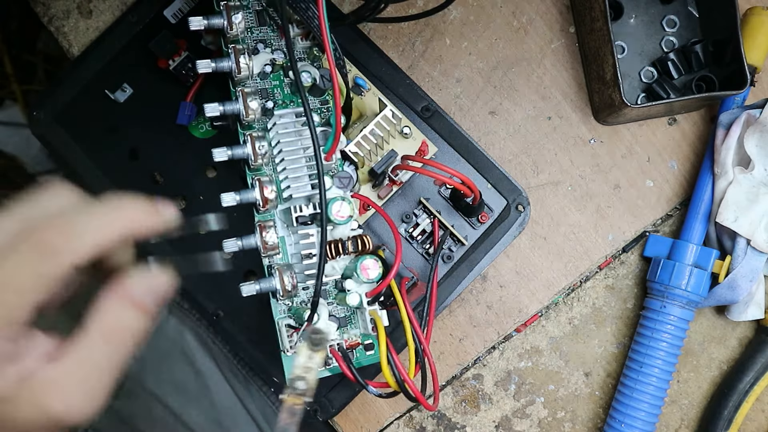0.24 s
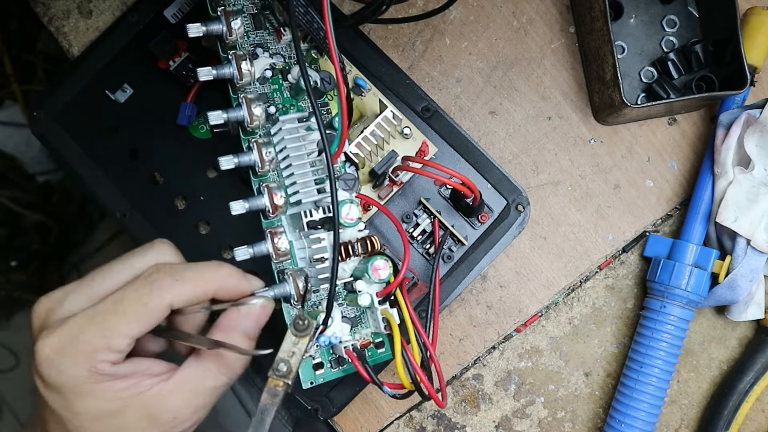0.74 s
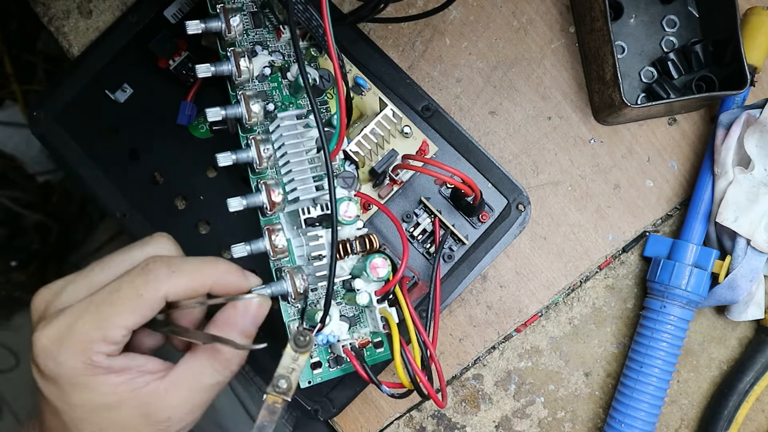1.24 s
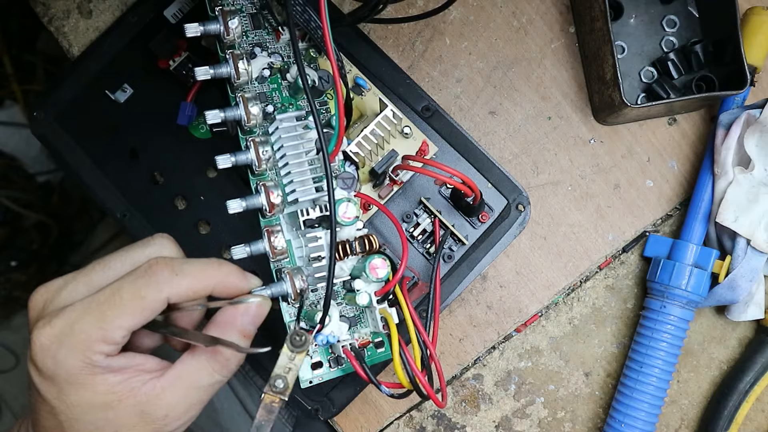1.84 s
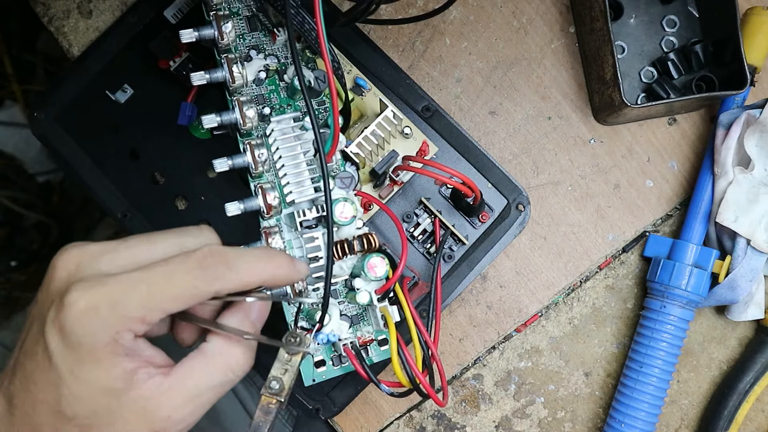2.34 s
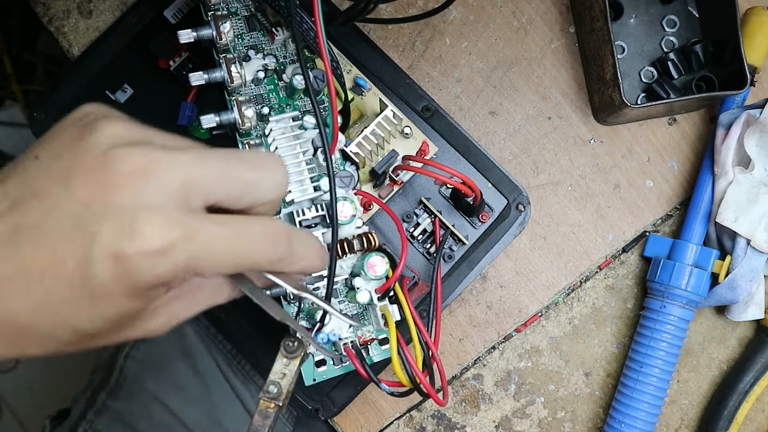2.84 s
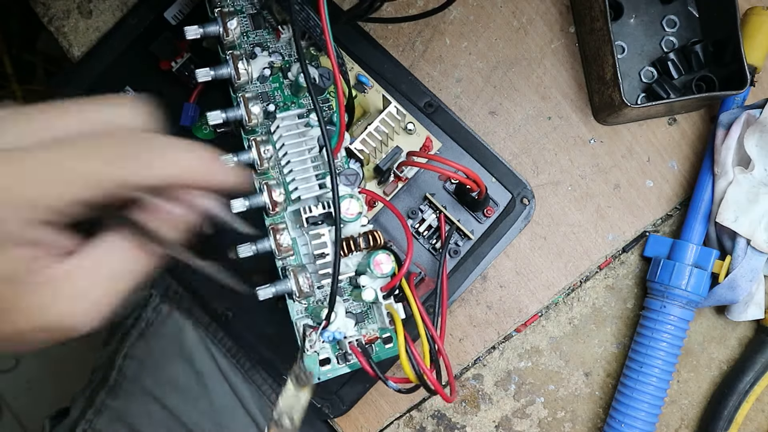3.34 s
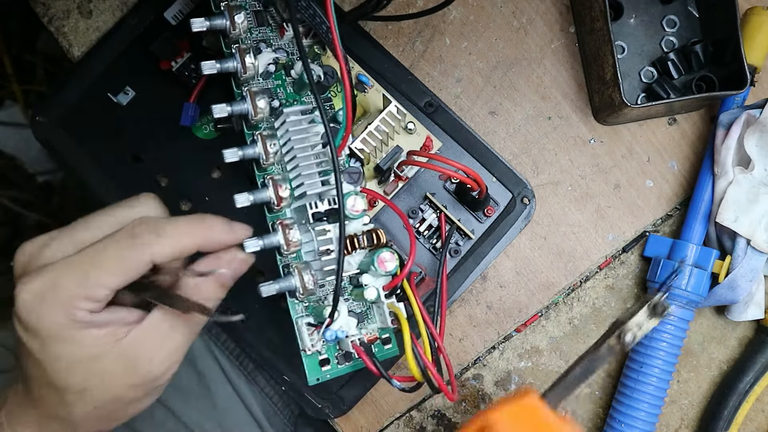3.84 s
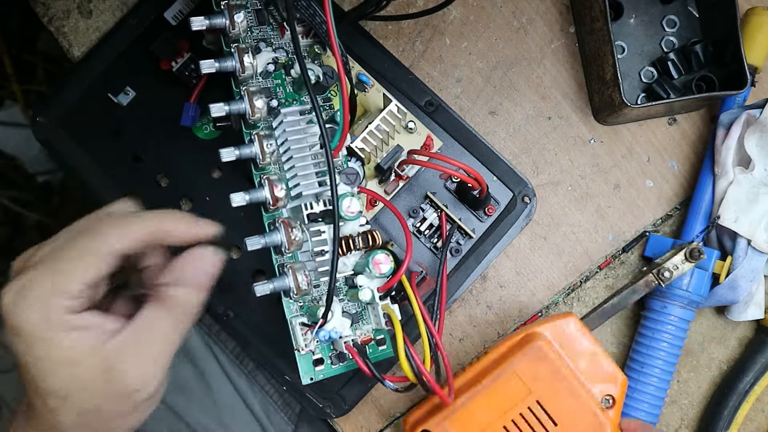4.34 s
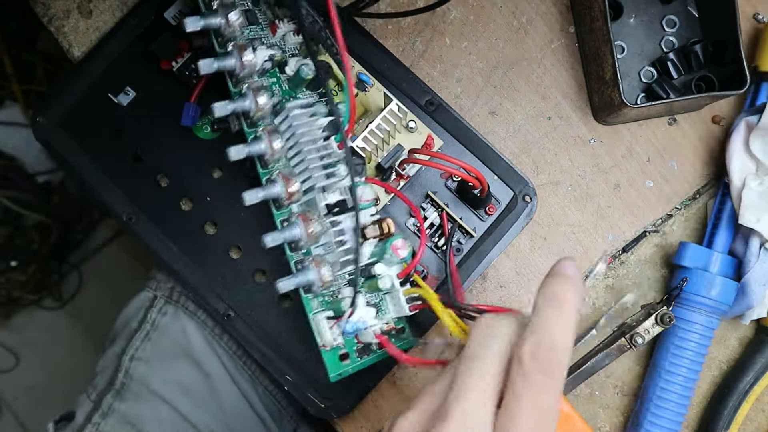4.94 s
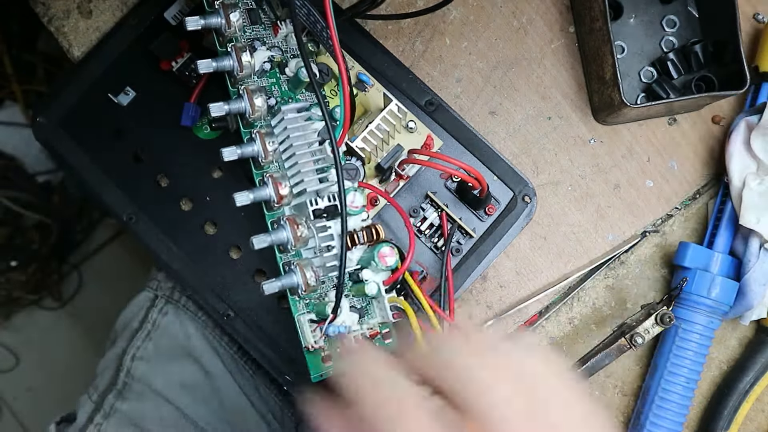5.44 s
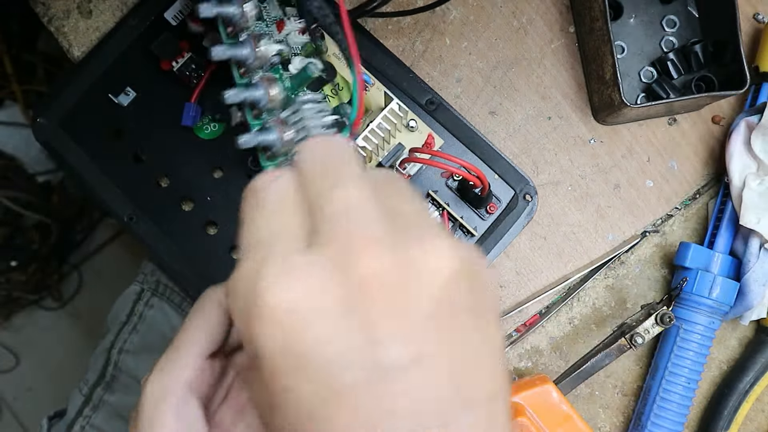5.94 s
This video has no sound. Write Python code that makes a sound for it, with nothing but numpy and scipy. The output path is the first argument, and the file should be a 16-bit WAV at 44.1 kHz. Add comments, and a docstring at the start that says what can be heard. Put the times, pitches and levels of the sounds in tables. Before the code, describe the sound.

A fan throbs softly in a workshop, along with a faint mains buzz. Close by, wires rustle and small parts tick, and a soldering tool's trigger gives two sharp snaps about two seconds apart. After a short plastic creak the handling gets busier: tools drop and rattle on a wooden bench with low thumps and a bright metallic clink, before a few light ticks are left over the hum.

```python
"""The sprung trigger of a plastic hand tool snaps at a workshop repair bench, ringing its shell.
The housing creaks in quick slips; dropped tools clatter and shake the wooden bench top.
Fingers and wires rub, tweezers and parts tick, with soft low thumps and one thin squeak.
A fan, mains buzz and far traffic hum behind; the recorder turns its gain down after loud knocks."""
import sys
import numpy as np
from scipy import signal
from scipy.fft import rfft, irfft, next_fast_len
from scipy.io import wavfile
from scipy.ndimage import uniform_filter1d, map_coordinates

SR = 44100
rng = np.random.default_rng(int(sys.argv[2]) if len(sys.argv) > 2 else 0)


def log_audio(samples):
    """Write samples as a 16-bit WAV file to the path given in sys.argv[1]."""
    # one column per channel
    frames = np.atleast_2d(samples).T
    # limit to full scale, then quantise
    limited = np.clip(frames, -1, 1)
    pcm = np.round(limited * 32767).astype(np.int16)
    wavfile.write(sys.argv[1], SR, pcm)


N = 273721
TIME_S = np.arange(N) / SR


def amp(db):
    return 10 ** (np.asarray(db) / 20)


def unit_rms(x):
    return x / np.sqrt(np.mean(x ** 2) + 1e-20)


def log_interp(points, hz):
    knots_hz, values = np.transpose(points)
    return np.interp(np.log(hz + 1), np.log(knots_hz + 1), values)


def wobble(rate_hz):
    """Smooth random curve, rate_hz knots a second."""
    knots = rng.standard_normal(int(N * rate_hz / SR) + 4)
    return map_coordinates(knots, [TIME_S * rate_hz])


def filtered(x, response):
    size = next_fast_len(len(x) + SR // 2)
    return irfft(rfft(x, size) * response(np.fft.rfftfreq(size, 1 / SR)), size)[:len(x)]


def resonate(x, modes):
    """Parallel resonances of alternating sign."""
    return filtered(x, lambda f: sum(
        (-1) ** k * amp(db) * 1j * f * width / (hz * hz - f * f + 1j * f * width)
        for k, (hz, width, db) in enumerate(modes)))


def noise(spectrum, count=N):
    return unit_rms(filtered(rng.standard_normal(count), lambda hz: amp(log_interp(spectrum, hz))))


def add(track, start_s, sound):
    part = track[round(start_s * SR):][:len(sound)]
    part += sound[:len(part)]


def highpass(f, corner_hz):
    return (1j * f / (corner_hz + 1j * f)) ** 2


def crack(t, t60_s, low_hz, tilt_hz, edge_hz):
    """Dying noise burst, tilted down from tilt_hz, rolled off outside low_hz to edge_hz."""
    burst = rng.standard_normal(len(t)) * amp(-60 * t / t60_s) * (1 - np.exp(-t / .00055))
    return filtered(
        burst, lambda f: highpass(f, low_hz) / (1 + 1j * f / tilt_hz) / (1 + 1j * f / edge_hz) ** 2)


SNAPS = [(1.166, -4.5, 1910), (3.1657, -1.5, 2003), (3.518, -21, 2040)]  # trigger snaps: start_s, level_db, pitch_hz
SHELL_MODES = [(.5, -11), (1, 2), (1.5, -11.5), (1.899, -9), (2.6, -14.5), (3.4, -27), (5.2, -24)]  # shell partials: pitch_ratio, level_db
TAIL_SPECTRUM = [(500, -30), (1200, -16.5), (1680, -14), (1850, 2.5), (2010, 2.5), (2220, -13), (3600, -15),
                 (5000, -18.5), (12000, -36), (16000, -51)]  # housing after a snap: freq_hz, density_db

def trigger():
    """Each snap: a brief, level ring cuts off sharply, then a small bounce and a ringing tail."""
    rebound_s, rebound_db, rebound_ratio = .0052, -14, .86
    out, t = np.zeros(N), np.arange(SR // 2) / SR
    ring_envelope = (1 - np.exp(-t / .00045)) / (1 + (t / .0023) ** 6)
    add(out, 0, amp(-37 - 60 * t / .61) * noise(TAIL_SPECTRUM, len(t)))  # an earlier snap dies away
    for start_s, level_db, pitch_hz in SNAPS:
        phase = 2 * np.pi * pitch_hz * t
        ring = sum(amp(db + rng.normal(0, 1)) * np.sin(ratio * phase + rng.uniform(0, 6))
                   for ratio, db in SHELL_MODES)
        shell = filtered(ring_envelope * ring, lambda f: highpass(f, 600))
        decay = amp(-18 - 60 * t / .051) + amp(-35 - 60 * t / .61)
        tail = decay * (1 - np.exp(-t / .001)) * noise(TAIL_SPECTRUM, len(t))
        click = amp(1.5) * crack(t, t60_s=.0079, low_hz=2000, tilt_hz=5000, edge_hz=13000)
        rebound = ring_envelope * np.sin(rebound_ratio * phase)
        add(out, start_s, amp(level_db) * (shell + tail + click))
        add(out, start_s + rebound_s, amp(level_db + rebound_db) * rebound)
    return out


AIR_LEVELS = [(0, -49.5, -43), (.7, -46.5, -42), (1.4, -48, -45), (3, -47, -42), (3.6, -46.5, -44),
              (4.2, -46.5, -41), (4.9, -42, -42), (5.4, -41, -40), (5.65, -47, -51), (6.21, -47.5, -41)]  # background levels: time_s, noise_gain_db, hum_db
ROOM_SPECTRUM = [(15, -60), (25, -15), (48, -22), (87, -8.5), (110, -10), (129, -9), (154, -15), (260, -10),
                 (364, -12.5), (566, -18), (612, -19), (2080, -25.5), (2560, -30), (5300, -41),
                 (12500, -66.5), (16200, -85), (22000, -120)]  # room noise: freq_hz, density_db
ROOM_BANDS = [(901, 83, 5.5), (1367, 107, 5), (2160, 240, 3), (4480, 310, -3), (5460, 560, 7.5),
              (6780, 600, 5.5), (8000, 1100, 4)]  # its peaks and dips: centre_hz, half_width_hz, gain_db
FAN_TONES = [(81.5, 7.5, 3), (158.7, 6.8, -8), (241.7, 5.8, -10.5)]  # fuzzy fan tones: centre_hz, half_width_hz, level_db

def room_and_fan():
    """Broad room noise under a fan's slowly throbbing hum."""
    throb_period_s, throb_peak_s, throb_db = .568, .07, 2.1
    knots_s, *levels = np.transpose(AIR_LEVELS)
    noise_gain_db, hum_db = (np.interp(TIME_S, knots_s, db) for db in levels)
    air = filtered(noise(ROOM_SPECTRUM), lambda f: amp(
        sum(db * np.exp(-((f - hz) / width) ** 2) for hz, width, db in ROOM_BANDS)))
    hum = filtered(rng.standard_normal(N), lambda f: sum(
        amp(db) / (1 + ((f - hz) / width) ** 2) for hz, width, db in FAN_TONES))
    air_db = noise_gain_db + 4 + .7 * wobble(6)
    throb = np.cos(2 * np.pi * (TIME_S - throb_peak_s) / throb_period_s)
    return amp(air_db) * unit_rms(air) + amp(hum_db + throb_db * throb) * unit_rms(hum)


MAINS_LINES = [(100, 4), (400, -16), (500, -9), (608, -8), (908, -15)]  # buzz tones: pitch_hz, relative_db

def mains_buzz():
    """Transformers and lamps hold their pitches, wavering in level."""
    lines = sum(amp(db + 1.4 * wobble(4)) * np.sin(2 * np.pi * hz * TIME_S) for hz, db in MAINS_LINES)
    return amp(-49.5) * lines


RUBS = [(0, -48, .01, .04), (.12, -63, .05, .08), (2.95, -62, .03, .07), (3.35, -70, .03, .04),
        (3.66, -57, .03, .11), (4.3, -72, .04, .08), (4.45, -68, .05, .04), (4.62, -57, .06, .25),
        (4.85, -59.5, .15, .1)]  # rubbing strokes: peak_s, gain_db, rise_s_per_10db, fall_s_per_10db
RUB_SPECTRUM = [(300, -13), (1000, 2), (3000, 1), (7000, -17), (10000, -17), (14000, -23), (16000, -30)]  # friction noise: freq_hz, density_db
BOARD_MODES = [(630, 78, -3), (803, 129, -1.5), (1017, 126, -2), (1320, 210, -8.5)]  # board on its plate: centre_hz, width_hz, gain_db
TOOL_MODES = [(1390, 146, 5), (1840, 220, 5), (2240, 220, 3.5), (2800, 260, 1.5), (3560, 260, -5),
              (4340, 650, -9)]  # tool resonances: centre_hz, width_hz, gain_db

def rustle():
    """Fingers and wires rub in uneven grains; tiny catches tap the board and tools."""
    catches_per_s, scatter_db, catch_db = 700, 1.5, -1.5
    envelope = sum(amp(db + 10 * np.minimum((TIME_S - peak_s) / rise, (peak_s - TIME_S) / fall))
                   for peak_s, db, rise, fall in RUBS)
    grains = amp(2.5 * wobble(200) + 2.5 * wobble(45))
    catches = (rng.random(N) < catches_per_s / SR) * rng.standard_normal(N)
    catches *= amp(scatter_db * rng.exponential(size=N))
    friction = unit_rms(grains * noise(RUB_SPECTRUM))
    taps = unit_rms(resonate(catches, BOARD_MODES + TOOL_MODES))
    return amp(9) * envelope * (friction + amp(catch_db) * taps)


TICKS = [ (.050, -31.5, 2080, -1.5), (.129, -38, 4900, -3), (.840, -29.5, 1510, -18),
         (.8486, -25, 2110, -8), (.849, -29.5, 3580, -12), (1.1444, -35, 1010, -1), (1.159, -29, 1590, -18),
         (2.950, -29, 1480, -4), (3.1174, -32, 2040, 3), (3.132, -29, 1500, -15), (3.094, -32, 920, -16),
         (3.215, -29.5, 1100, -5), (3.27, -31, 1400, -14), (3.648, -25, 1880, 2), (3.653, -26, 1100, -4),
         (3.6717, -14, 1120, -8), (3.690, -27, 3530, -14), (3.775, -30.5, 1420, -6),
         (3.814, -18.5, 1184, -17), (3.825, -17, 1075, -10), (3.859, -19, 2350, -1),
         (3.8595, -19, 1050, -15), (3.995, -19, 2440, 2), (4.183, -29, 2100, -15), (4.304, -20, 993, -13),
         (4.315, -23, 993, -20), (4.341, -25.5, 2070, .6), (4.406, -31, 2160, -10),
         (4.443, -20, 460, -11.5), (4.539, -27, 1000, -27), (4.589, -38, 6950, 3),
         (4.614, -23.5, 424, -3.5), (4.642, -28, 930, -9), (4.659, -28, 925, -17), (4.749, -29.5, 1020, -5),
         (4.792, -25.5, 2160, -14), (4.833, -18, 976, -11), (4.852, -22.5, 1210, -22),
         (4.874, -37, 6300, 3), (4.910, -28, 2000, -12), (4.966, -20, 1750, -8), (4.998, -22, 1500, -5),
         (4.036, -27, 1400, -3), (4.622, -33, 5800, -3), (4.738, -36, 3200, 2.2), (4.826, -24, 330, -20),
         (5.479, -34, 6300, -5), (5.383, -16, 4900, -8), (5.3835, -9, 2850, -20), (.158, -43, 7500, -3),
         (5.046, -25, 4330, 4), (5.099, -24, 1000, -16), (5.321, -29.5, 5200, -1), (5.414, -20, 3500, 1.2),
         (5.441, -6.5, 2860, -8), (5.817, -35, 1220, -10), (5.963, -36, 2970, 1.1),
         (6.034, -21.5, 1150, -15), (6.141, -30.5, 2170, -4)]  # tweezers and parts: start_s, level_db, pitch_hz, grit_db

def ticks():
    """Small parts ring unevenly over a gritty burst: higher is shorter, grittier is brighter."""
    overtone_ratio, overtone_db = 2.02, -12
    out, t = np.zeros(N), np.arange(SR // 10) / SR
    for start_s, level_db, pitch_hz, grit_db in TICKS:
        t60_s = .024 * (1000 / pitch_hz) ** .4
        drift_rad = .17 * uniform_filter1d(np.cumsum(rng.standard_normal(len(t))), size=24)
        phase = 2 * np.pi * pitch_hz * t + drift_rad
        ring = np.sin(phase) + amp(overtone_db) * np.sin(overtone_ratio * phase)
        envelope = amp(-60 * t / t60_s) * (1 - np.exp(-t / .00017))
        grit = crack(t, t60_s, low_hz=530, tilt_hz=1200, edge_hz=8000 * amp(.24 * grit_db))
        add(out, start_s, amp(level_db) * (ring * envelope + amp(grit_db + 11) * grit))
    return out


THUMPS = [(.05, -39, 140, .1), (0.584, -39, 150, 0.073), (.63, -29.5, 80, .1), (.75, -38, 45, 0.059),
          (3.824, -32.5, 150, 0.1), (4.04, -30, 85, .08), (4.47, -33.5, 125, .1), (4.65, -38, 120, .15),
          (2.8, -43, 36, .12), (3.3, -45, 38, .06), (3.47, -42, 45, .07), (5.02, -32, 50, .22),
          (5.3, -43, 48, .2), (6.1, -36.5, 135, 0.12), (6.09, -32, 72, .12)]  # low thumps and sway: peak_s, level_db, pitch_hz, length_s

def low_thumps():
    """Soft low thumps and bench sway, some following the dropped tools."""
    return sum(amp(db) * np.exp(-(2 * (TIME_S - peak_s) / length_s) ** 2)
               * np.sin(2 * np.pi * hz * TIME_S) for peak_s, db, hz, length_s in THUMPS)


def squeak():
    """A thin, unsteady tone swells and bends upward."""
    peak_s, bend_s, rise_s_per_10db, fall_s_per_10db = .118, .004, .009, .003
    t = TIME_S - peak_s
    pitch_hz = 11300 + 450 * np.tanh(t / bend_s) + 120 * wobble(600)
    level_db = -38 + 10 * np.minimum(t / rise_s_per_10db, -t / fall_s_per_10db)
    return amp(level_db) * np.sin(2 * np.pi * np.cumsum(pitch_hz) / SR)


def far_motor():
    """A distant drone swells, sags and stops."""
    pitch_hz, peak_s, stop_s = 220, 2.28, 3.12
    rise_db_per_s, sag_db_per_s, fade_db_per_s = 30, 6, 200
    t = TIME_S - peak_s
    level_db = -41 + np.minimum(rise_db_per_s * t, -sag_db_per_s * t) + 1.3 * wobble(4.9)
    level_db -= fade_db_per_s * np.maximum(TIME_S - stop_s, 0)
    return amp(level_db) * np.sin(2 * np.pi * pitch_hz * TIME_S)


HOUSING_MODES = [(960, 130, 1.2), (1110, 120, -2), (1300, 220, -4), (2220, 300, -13), (3220, 78, -32)]  # plastic housing: centre_hz, width_hz, gain_db

def creak():
    """The dragged housing sticks and slips; each slip is a short scratch."""
    start_s, rise_s, hold_s, slide_s = 3.864, .014, .057, .006
    body_fall_db_per_s, rasp_fall_db_per_s = 650, 1500
    t = TIME_S - start_s
    drag = amp(-24) * np.clip(t / rise_s, 0, 1)
    release_s = np.maximum(t - rise_s - hold_s, 0)
    slip_rate_hz = 125 * amp(1.2 * wobble(70))
    slips = np.diff(np.floor(np.cumsum(slip_rate_hz) / SR), prepend=0) * amp(.51 * wobble(100))
    slide = np.convolve(slips, np.hanning(round(slide_s * SR)))[:N]
    force = .6 * signal.lfilter([1], [1, -.9], slips) + (.07 + .3 * slide) * rng.standard_normal(N)
    body = amp(-body_fall_db_per_s * release_s) * unit_rms(resonate(force, HOUSING_MODES))
    hiss = noise([(1200, -5), (2300, 12.5), (4500, -3), (6000, 4), (7500, -8), (9000, -11), (15000, -44)])
    scratches = (.2 + signal.lfilter([1], [1, -.99], slips)) * hiss
    rasp = amp(-14 - rasp_fall_db_per_s * release_s) * unit_rms(scratches)
    return drag * (body + rasp)


# tool landings: start_s, gain_db, weight_db, hardness_db, t60_s,
# rattle_db, crack_db, crack_hz, blow_db, clatter_s
DROPS = [ (3.997, -6.5, 4, -13, .03, -18, -14, 2600, 26, .008),
         (4.931, -8, 4.5, -15, .057, -14, -17, 4300, 22, .012),
         (5.2175, -5, -3, -20, .055, -16, -11, 5000, 25, .006),
         (5.268, -16.5, 1.1, -13, .025, -20, -21, 4000, 22, .008),
         (5.3805, -8, -5, -6, .035, -15, -20, 7000, 17, .014),
         (5.446, -20.5, 1.1, -8, .043, -11, -24, 4500, 20, .008)]
BENCH_MODES = [(137.4, 51, -1), (247, 103, -0.5), (309.7, 66, 5), (465, 81, -1.5), (573, 55, -3)]  # wooden top: centre_hz, width_hz, gain_db

def tool_drops():
    """A blow, a clatter, a rattle: heavy tools shake the bench top, hard ones ring themselves."""
    rattle_t60_s = np.array([[.35], [.3], [.2]])  # bench, board, tool
    out, t = np.zeros(N), np.arange(SR // 2) / SR
    for (start_s, gain_db, weight_db, hardness_db, t60_s,
         rattle_db, crack_db, crack_hz, blow_db, clatter_s) in DROPS:
        clatter = amp(-60 * np.maximum(t - clatter_s, 0) / t60_s)
        contacts = amp(4.5 * unit_rms(uniform_filter1d(rng.standard_normal(len(t)), size=150)))
        rattle = contacts * amp(rattle_db - 60 * t / rattle_t60_s)
        force = rng.standard_normal((3, len(t))) * (clatter + rattle)
        force[:, 0] = amp(blow_db)
        bench = amp(weight_db) * resonate(force[0], BENCH_MODES)
        board = resonate(force[1], BOARD_MODES)
        tool = amp(hardness_db) * resonate(force[2], TOOL_MODES)
        # treble roll-off dulls the knock's body
        body = filtered(bench + board + tool, lambda f: 1 / (1 + 1j * f / 6000) ** 2)
        burst = crack(t, t60_s=.08, low_hz=1500, tilt_hz=9000, edge_hz=9000)
        edge = resonate(burst, [(crack_hz, .6 * crack_hz, 0)])
        add(out, start_s, amp(gain_db) * (amp(12.5) * body + amp(crack_db) * edge))
    return out


WALL_DECAY = [(100, 0.48), (1000, 0.49), (3000, 0.51), (10000, 0.19)]  # reverberation: freq_hz, t60_s

def walls(x):
    """Room reverb, with a fresh noise tail each quarter second so no pitch rings out."""
    out, block = np.zeros(N), SR // 4
    for start in range(0, N, block):
        hz, t, spectra = signal.stft(rng.standard_normal(SR // 2), SR, nperseg=256)
        decay = amp(-60 * t / log_interp(WALL_DECAY, hz)[:, None])
        tail = signal.istft(spectra * decay, SR, nperseg=256)[1]
        delayed = np.pad(x[start:start + block], (300, 0))
        add(out, start / SR, signal.fftconvolve(delayed, tail / np.linalg.norm(tail)))
    return out


def scene():
    """Mono mix; only the creak, drops and ticks feed the reverb."""
    handling, parts = creak() + tool_drops(), ticks()
    reverb = walls(amp(-12) * handling + amp(-17) * parts)
    close = handling + parts + trigger() + squeak() + rustle() + low_thumps()
    return (close + reverb + room_and_fan() + mains_buzz() + far_motor())[None]


def record(dry):
    """Gain control that follows recent power and recovers slowly, soft clipping, band limit."""
    averaging_s, knee_db, top_hz = .5, -27.5, 16300
    pole = np.exp(-1 / (averaging_s * SR))
    power = signal.lfilter([1 - pole], [1, -pole], dry[0] ** 2)
    levelled = dry[0] * (1 + power / amp(knee_db) ** 2) ** -.3
    rounded = levelled / (1 + np.abs(levelled / 1.06) ** 4) ** .29
    return filtered(rounded, lambda hz: hz < top_hz)[None]


dry = scene()
out = record(dry)
log_audio(out)
```